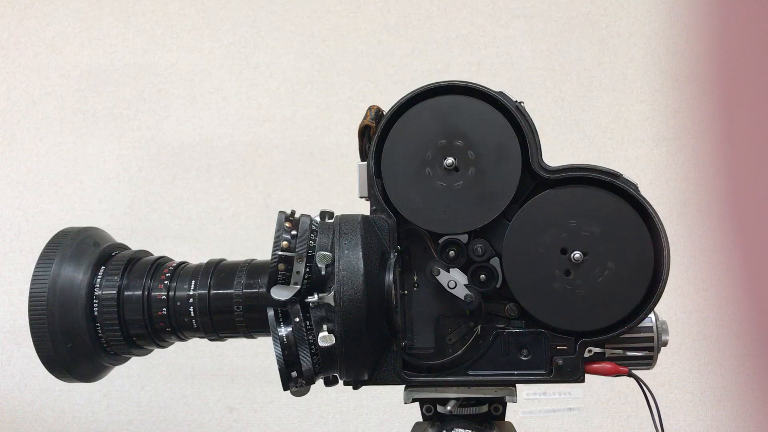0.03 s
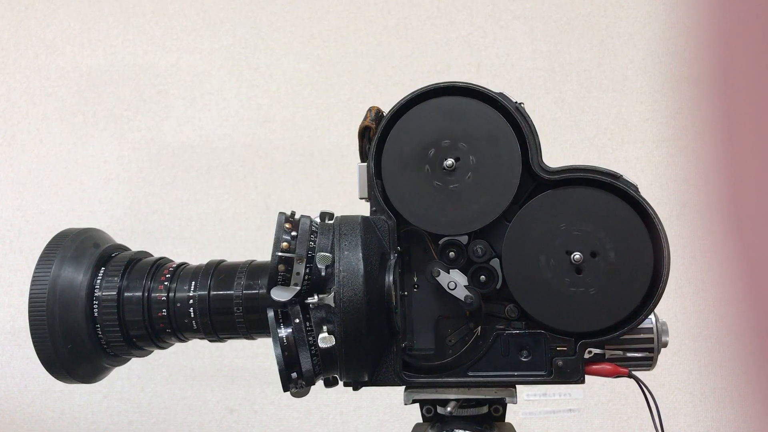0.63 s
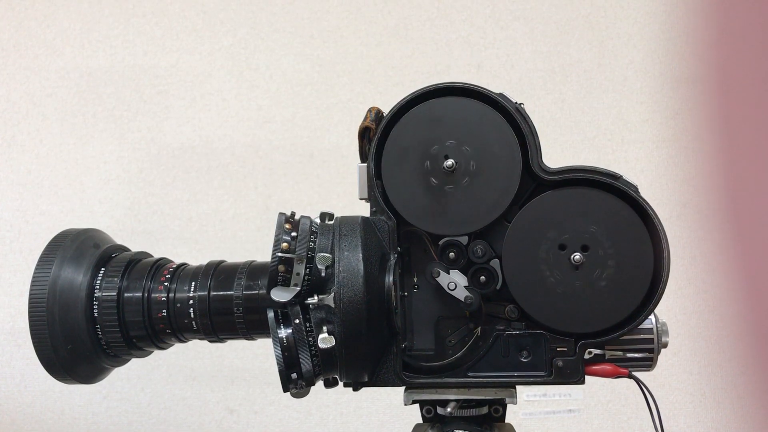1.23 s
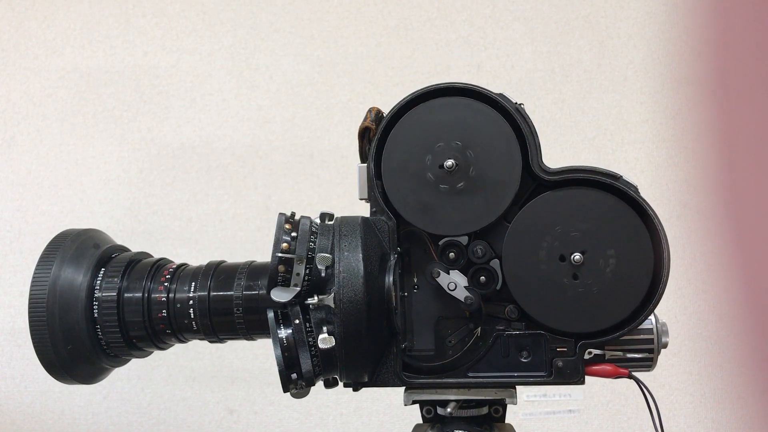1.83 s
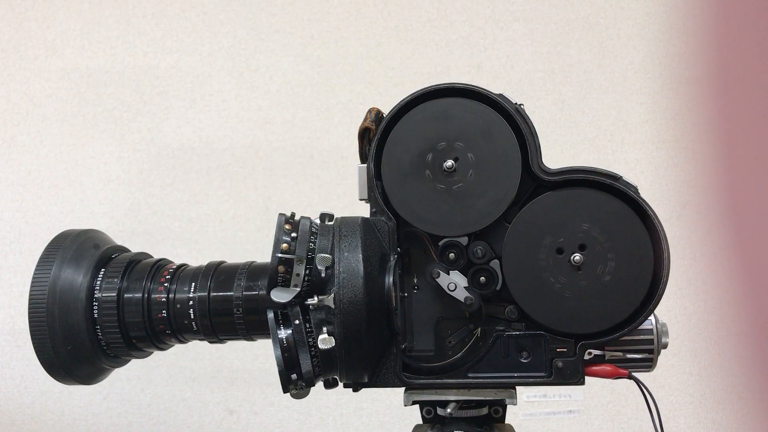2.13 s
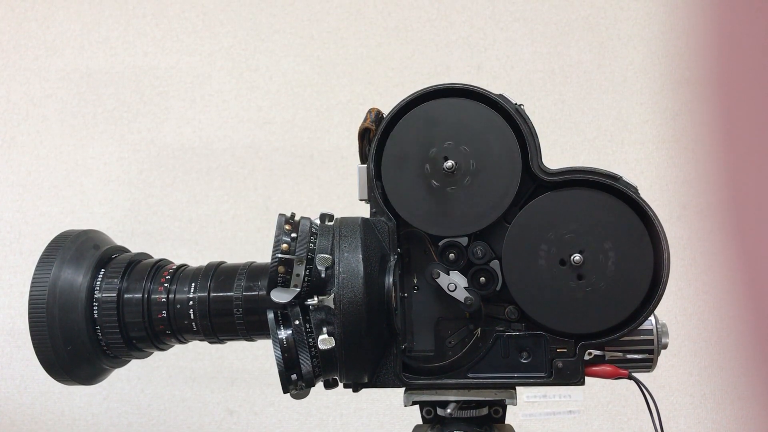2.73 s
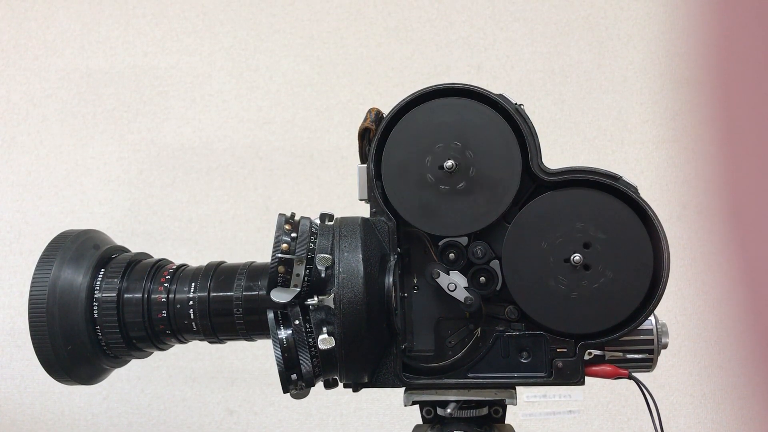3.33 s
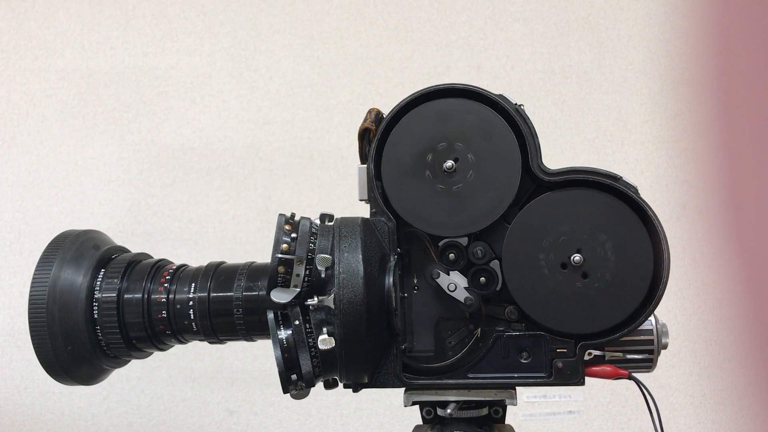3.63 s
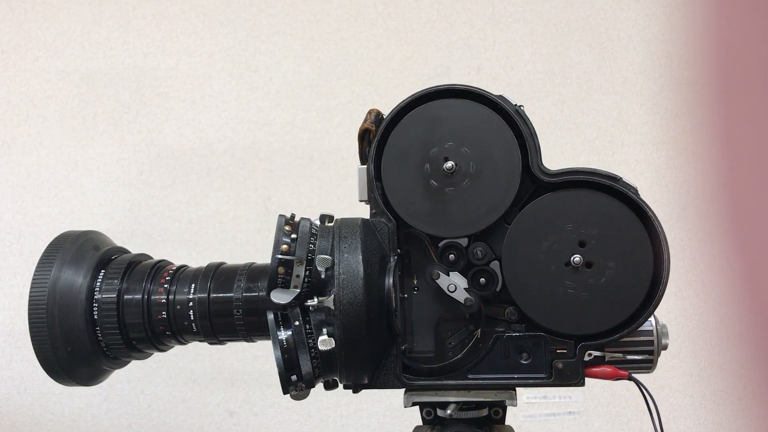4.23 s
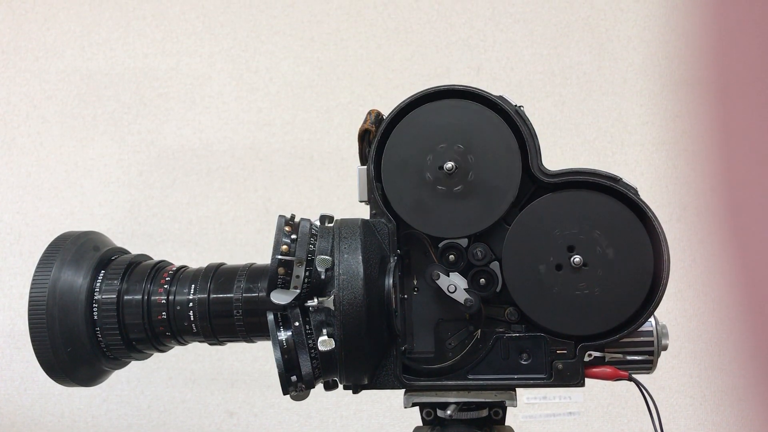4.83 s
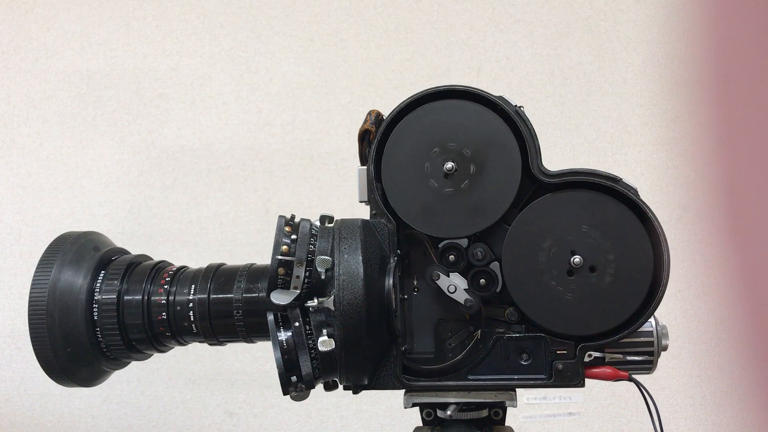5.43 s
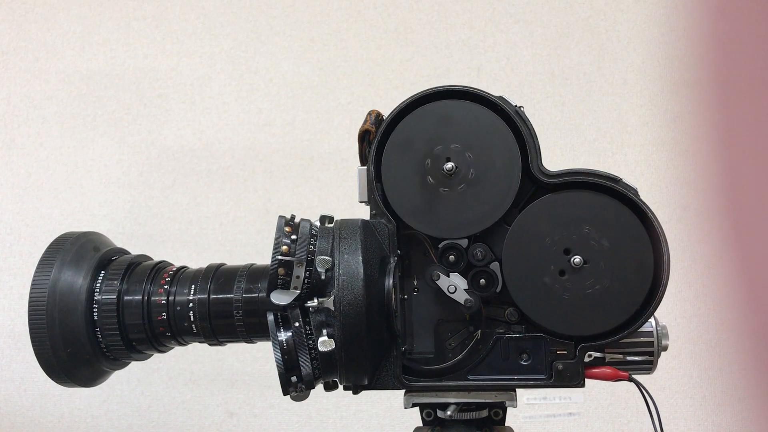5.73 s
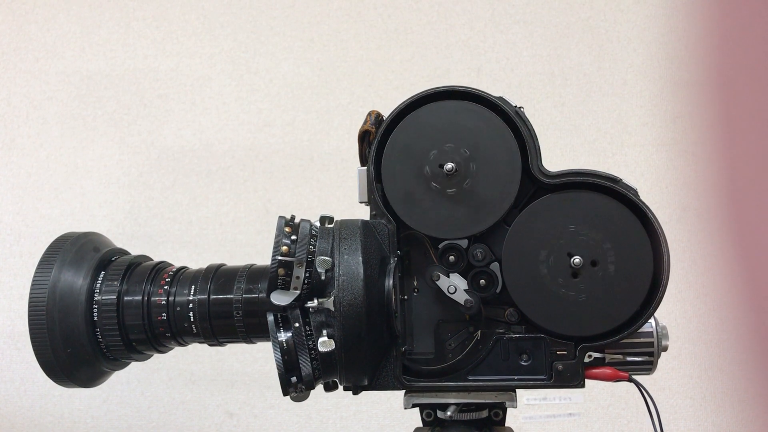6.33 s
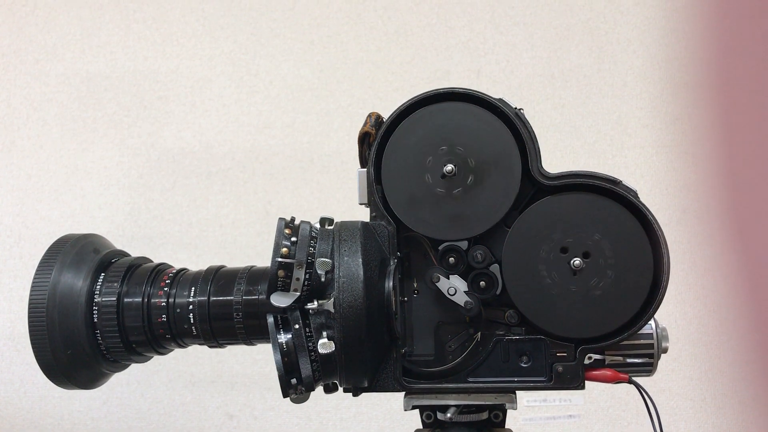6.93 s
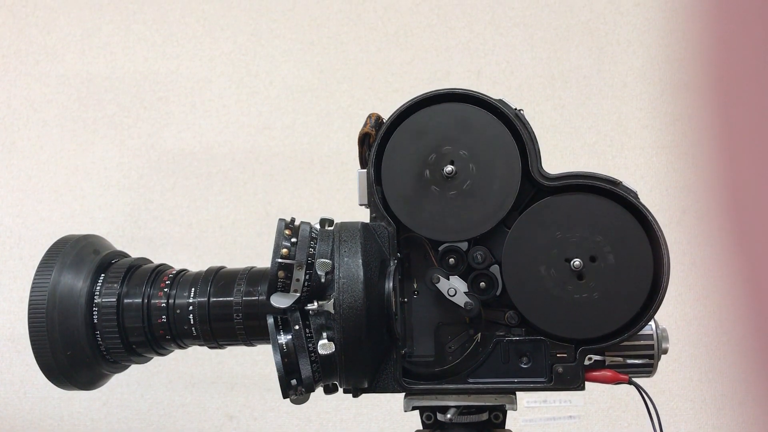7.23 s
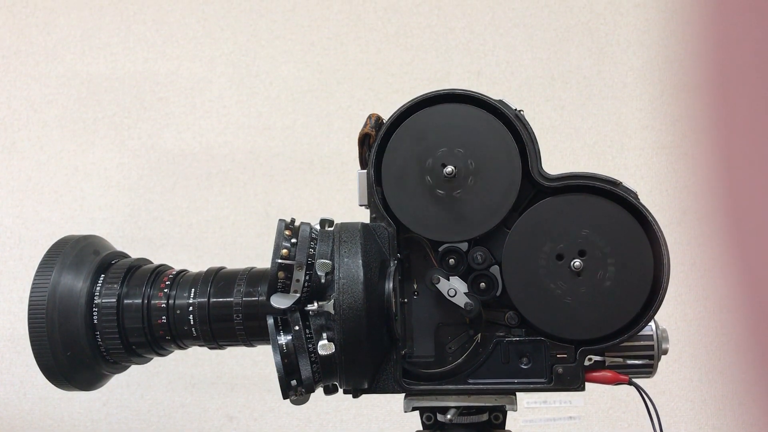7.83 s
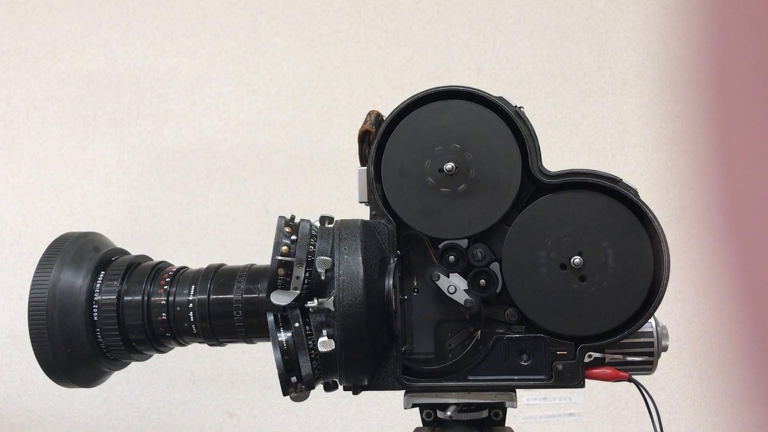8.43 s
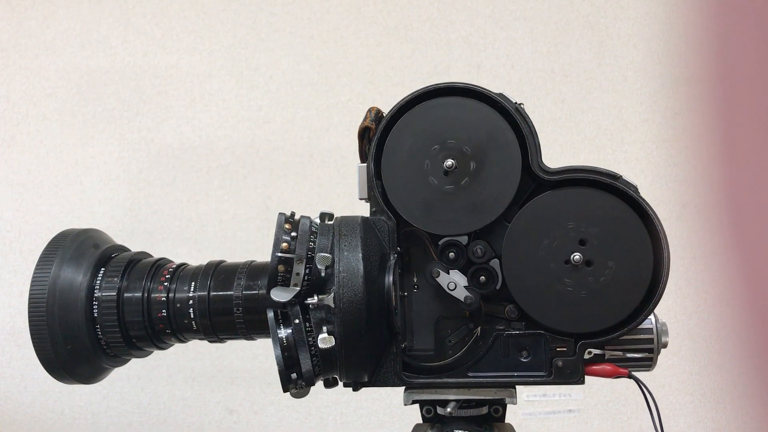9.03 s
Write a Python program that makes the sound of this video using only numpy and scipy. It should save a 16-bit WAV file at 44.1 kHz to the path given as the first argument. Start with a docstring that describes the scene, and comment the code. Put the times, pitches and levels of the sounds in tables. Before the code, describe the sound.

Close up, a running film camera makes a rapid, regular clatter of small clicks and knocks over a constant whirring gear tone, with a light rasp of moving film. The sound has little bass and keeps an even speed, chattering slightly harder in the last third. The room behind is quiet, with a faint electrical hum, a low rumble and a few barely audible soft bumps in the first half.

```python
"""Film camera in a quiet room

Close to the microphone, a film camera runs at about 26 frames a second. Once a frame the claw
ticks in, drags the film through the ringing gate, and the linkage knocks. Under it the gear train
whines and rattles in the housing; faint mains hum and a few soft bumps lie farther back."""
import sys
import numpy as np
from scipy import signal
from scipy.fft import rfft, irfft
from scipy.io import wavfile
from scipy.ndimage import map_coordinates

SR = 44100
rng = np.random.default_rng(int(sys.argv[2]) if len(sys.argv) > 2 else 0)


def digitize_waveform(pressure):
    """Quantize a signal to 16-bit integers and store it at the path in sys.argv[1].

    Rows of a 2-D input are taken as channels; values are limited to [-1, 1].
    """
    field = np.atleast_2d(pressure).T
    bounded = np.clip(field, -1, 1)
    quanta = np.round(bounded * 32767).astype(np.int16)
    wavfile.write(sys.argv[1], SR, quanta)


N = 404838
TIME = np.arange(N) / SR


def undb(db):
    """Decibels to gain."""
    return 10 ** (np.asarray(db) / 20)


def level(x, db):
    """Scale to an rms level."""
    return x * undb(db) / np.sqrt(np.mean(x ** 2))


def ramp(at, start, length):
    """Rise from 0 to 1 along a straight line."""
    return np.clip((at - start) / length, 0, 1)


def wander(rate_hz):
    """Slow random motion with a spread near 1."""
    knots = rng.standard_normal(2048)
    return np.interp(TIME * rate_hz, np.arange(len(knots)), knots)


def band(x, hz, width_hz, order=1):
    """One resonance, gain 1 at its centre; higher orders swell before they fade."""
    edges = np.clip([hz - width_hz / 2, hz + width_hz / 2], 40, SR * .45)
    return signal.sosfilt(signal.butter(order, edges, "band", fs=SR, output="sos"), x)


def ring(force, modes, size=4096):
    """Pass a force through resonances (pitch_hz, width_hz, gain_db)."""
    freq = np.arange(size // 2 + 1) * SR / size
    power = sum(undb(db) ** 2 / (1 + (2 * (freq - hz) / width) ** 2) ** 2 for hz, width, db in modes)
    # minimum phase: the modes ring only after the force
    cepstrum = irfft(np.log(power + 1e-14) / 2)
    cepstrum[1:size // 2] *= 2
    cepstrum[size // 2 + 1:] = 0
    response = irfft(np.exp(rfft(cepstrum)))
    return signal.oaconvolve(force, response)[:N]


def contact(frame, repeat, spiky_db):
    """Rough contact force; the share `repeat` comes from the same surfaces meeting in every frame."""
    frame_samples = int(N / (frame[-1] - frame[0]))
    surface = rng.standard_normal(frame_samples)
    recurring = map_coordinates(surface, [frame % 1 * frame_samples], order=3, mode="grid-wrap")
    fresh = level(rng.standard_normal(N) * undb(spiky_db * rng.standard_normal(N)), 0)
    return np.sqrt(repeat) * recurring + np.sqrt(1 - repeat) * fresh


def strikes(frame, delay_ms, scatter_db, play_ms):
    """One impulse a frame, timed from the claw's entry, scattered in time and strength."""
    entries = np.flatnonzero(np.diff(np.floor(frame)))
    late, strength = rng.standard_normal((len(entries), 2)).T
    at = entries + np.round((delay_ms + play_ms * late) * SR / 1000).astype(int)
    return np.bincount(np.maximum(at, 0), undb(scatter_db * strength), N)[:N]


def room(x, t60_s=0.19, wet_db=-18):
    """Weak, slightly dull wall reflections reach the microphone just after the direct sound."""
    t = TIME[:SR // 3]
    noise = band(rng.standard_normal(len(t)), hz=3920, width_hz=6300)
    tail = noise * undb(-60 * t / t60_s) * (t > .004)
    tail /= np.sqrt(np.sum(tail ** 2))
    return x + undb(wet_db) * signal.fftconvolve(x, tail)[:N]


# Spectrum of the rumble around the microphone: frequency_hz, relative_db
RUMBLE_SPECTRUM = [(15, -33), (30, -9), (45, 6.5), (75, 0.5), (130, -3), (170, -4.5), (210, -8.5),
                   (280, -7), (370, -3), (450, -10), (560, -10), (900, -66), (4000, -60)]
def rumble(level_db=-62.5):
    """The room and the stand rumble low and steadily."""
    hz, db = np.transpose(RUMBLE_SPECTRUM)
    freq = np.arange(1, N + 2) * SR / (2 * N)
    colour = undb(np.interp(np.log(freq), np.log(hz), db))
    noise = irfft(rfft(rng.standard_normal(2 * N)) * colour)[:N]
    return level(noise, level_db)


# Mains tones, faint in the room: pitch_hz, level_db
HUM_TONES = [(50, -63), (100, -66)]
def mains_hum():
    """The mains hums at its own frequency and the octave above."""
    return sum(np.sqrt(2) * undb(db) * np.sin(2 * np.pi * (hz * TIME + rng.random()))
               for hz, db in HUM_TONES)


# Bumps in the background: start_s, strength_db
SOFT_BUMPS = [(2.531, -44), (3.199, -38), (3.209, -49), (3.578, -51), (3.841, -48)]
def bumps():
    """Soft blows ring three low resonances and thud dully in the room."""
    start_s, strength_db = np.transpose(SOFT_BUMPS)
    force = np.bincount((start_s * SR).astype(int), undb(strength_db), N)
    thud = ring(force, [(126, 56, 1.6), (210, 220, -2), (328, 170, -1.3)])
    return room(thud) * undb(strength_db.max()) / np.abs(thud).max()


# Spells of a thin whistle at the camera: start_s, length_s, boost_db
WHISTLE_SWELLS = [(.05, 1.35, 7), (2.3, 1.46, 8.5), (4.85, 1.15, 6.5)]
def whistle(rest_db=-59.5, swell_s=0.23):
    """One narrow resonance sings up in spells and sinks back."""
    swell_db = sum(db * (ramp(TIME, start, swell_s) - ramp(TIME, start + length, swell_s))
                   for start, length, db in WHISTLE_SWELLS)
    tone = band(rng.standard_normal(N), hz=3930, width_hz=50, order=2)
    return level(tone, rest_db) * undb(swell_db)


# Speed of the camera's motor: time_s, speed_fps
MOTOR_SPEED = [(0, 25.725), (1.3, 25.691), (2.4, 25.749), (5.3, 25.76), (9.18, 25.725)]
def motor(start_frame=.5625):
    """The motor sags a little early on; returns the running frame count and frames a second."""
    fps = np.interp(TIME, *np.transpose(MOTOR_SPEED))
    return start_frame + np.cumsum(fps) / SR, fps


# Resonances of the housing, close to the microphone: pitch_hz, width_hz, gain_db
HOUSING_MODES = [(702, 153, -9), (873.7, 136, -0.5), (1037, 135, -4), (1307, 80, -3), (1478, 307, -0.5),
                 (1910, 760, -3), (2260, 540, -11.5), (2690, 42, -8), (2890, 220, -10.5), (3230, 650, -8.5),
                 (3760, 210, -13), (4190, 810, -10.5), (4740, 220, -7.5), (5336, 550, -11.5),
                 (5970, 510, -15.5), (6990, 770, -13.5), (8400, 1300, -23), (9450, 560, -24.5),
                 (11200, 970, -23.5), (12900, 2100, -28.5)]
def housing(force):
    """The camera's shell rings when the mechanism shakes it."""
    return ring(force, HOUSING_MODES)


# Knocks of the shuttle on the housing, from the claw's entry: delay_ms, relative_db
SHUTTLE_KNOCKS = [(1.0, 8), (9.5, 7), (22.5, 9)]
def shuttle(frame, knock_db=-41.5, sway_db=2.0, sway_frames=8.9):
    """Soft knocks ring the housing's low modes; their strength sways about three times a second."""
    force = sum(undb(db) * strikes(frame, ms, scatter_db=2.5, play_ms=0.3) for ms, db in SHUTTLE_KNOCKS)
    sway = undb(sway_db * np.sin(2 * np.pi * frame / sway_frames + wander(0.97)))
    return level(band(housing(force * sway), hz=1107, width_hz=370), knock_db)


# Gear and motor tones from inside the camera: cycles_per_frame, relative_db
GEAR_WHINE = [(25.0, -58.6), (31.0, -58.8), (32.0, -55.3), (33.0, -40.7), (34.0, -54.1), (37.0, -57.1),
              (38.0, -55.0), (39.0, -55.2), (42.0, -53.8), (49.0, -54.5), (50.0, -47.2), (51.0, -55.7),
              (53.0, -53.3), (54.0, -56.4), (57.0, -55.8), (59.0, -53.3), (61.0, -57.3), (64.0, -55.6),
              (66.0, -55.0), (73.0, -55.7), (75.0, -55.0), (76.0, -52.0), (78.0, -56.2), (88.0, -59.1),
              (89.79, -59.5), (106.04, -60.7), (117.83, -60.9), (152.04, -58.6), (166.12, -59.2),
              (171.0, -57.5)]
def gears(frame, rattle_db=-36.5, whine_gain_db=0.6, slack_rad=.35, uneven_db=0.55, load_db=1.18):
    """Teeth mesh in steady tones and rattle the housing, hardest while the film is pulled."""
    force = contact(frame, repeat=0.085, spiky_db=4.5) * undb(uneven_db * wander(200))
    rattle = level(housing(force), rattle_db)
    whine = 0
    for multiple, db in GEAR_WHINE:
        # play between the teeth lets each tone wander a little in phase and strength
        phase = 2 * np.pi * (multiple * frame + rng.random()) + slack_rad * wander(9)
        strength = undb(db) * (1 + 0.071 * wander(11))
        whine += np.sqrt(2) * strength * np.sin(phase)
    load = undb(load_db * np.cos(2 * np.pi * (frame - 0.23)))
    return (rattle + undb(whine_gain_db) * whine) * load


# Resonances of the film gate inside the camera: pitch_hz, width_hz, gain_db
GATE_MODES = [(1030, 220, 0), (1890, 173, 3.5), (3200, 930, -25), (4430, 420, -7), (4636, 140, 1),
              (5770, 1649, -19.5), (6920, 990, -14), (7145, 144, -1), (8500, 1400, -17), (9820, 270, -11.5),
              (11100, 1200, -19.5), (11500, 1120, -11.5), (12960, 790, -18), (13400, 260, -10),
              (15600, 250, -23)]
def film(frame, fps, pull_db=-43.5, scatter_db=0.9, weave_db=3.5):
    """The film scrapes through the gate while the claw pulls it down; its hiss shifts as it weaves."""
    attack_ms, pull_ms = 2.5, 7.7
    slack_db, sag_db_per_ms, release_db_per_ms = -7, 0.56, 4.5
    ms = 1000 * (frame % 1) / fps
    # the film takes up the strain, slides as the claw slows, and is let go
    strain_db = slack_db * (1 - ramp(ms, 0, attack_ms))
    easing_db = sag_db_per_ms * ms + release_db_per_ms * np.maximum(ms - pull_ms, 0)
    grip = undb(strain_db - easing_db + scatter_db * wander(26))
    friction = contact(frame, repeat=.35, spiky_db=-2.0) * grip
    scrape = level(ring(friction, GATE_MODES), pull_db)
    weave = undb(weave_db * wander(12))
    return scrape + (weave - 1) * band(scrape, hz=10200, width_hz=1400)


# Claw and linkage blows at close range, from the claw's entry: delay_ms, pitch_hz, width_hz, level_db
CLAW_BLOWS = [(-0.1, 10470, 4340, -51), (-1.9, 4290, 890, -56), (0.6, 4730, 290, -53),
              (-1.46, 7150, 260, -55), (0.0, 1880, 356, -47), (2.4, 334, 205, -74.5), (5.5, 1740, 410, -49),
              (13.5, 9900, 3800, -63.5), (20.5, 6000, 2600, -61), (35, 9400, 3700, -77)]
def claw(frame, scatter_db=1.5, play_ms=.2):
    """The claw enters on time; the other blows of its linkage come a little early or late."""
    ticks = 0
    for k, (delay_ms, hz, width_hz, db) in enumerate(CLAW_BLOWS):
        force = strikes(frame, delay_ms, scatter_db, play_ms if k else 0)
        ticks += level(band(force, hz, width_hz, order=4), db)
    return ticks


def chatter(camera, start_s=6.33, rise_s=0.13, calm_db=-2.5, hard_db=2):
    """The mechanism starts to chatter harder in the midrange, and stays so."""
    mid_db = calm_db + (hard_db - calm_db) * ramp(TIME, start_s, rise_s)
    return camera + (undb(mid_db) - 1) * band(camera, hz=1460, width_hz=740)


def scene():
    """One microphone close to the camera, with the quiet room behind."""
    frame, fps = motor()
    drive = gears(frame) + shuttle(frame) + film(frame, fps) + whistle()
    # the mechanism is too small to radiate much bass
    bass_cut = signal.butter(10, 595, "high", fs=SR, output="sos")
    camera = chatter(signal.sosfilt(bass_cut, drive) + claw(frame))
    return (room(camera) + rumble() + mains_hum() + bumps())[None]


def record(dry):
    """The sound cuts in abruptly, drops out for an instant, and lacks its very top."""
    cut_in_s, gap_start_s, gap_end_s, fade_s = .0605, .0715, .083, .001
    gap = ramp(TIME, gap_start_s, fade_s) - ramp(TIME, gap_end_s, fade_s)
    heard = ramp(TIME, cut_in_s, fade_s) - gap
    top_cut = signal.ellip(10, .2, 70, 15900, fs=SR, output="sos")
    return signal.sosfilt(top_cut, dry * heard)


dry = scene()
out = record(dry)
digitize_waveform(out)
```